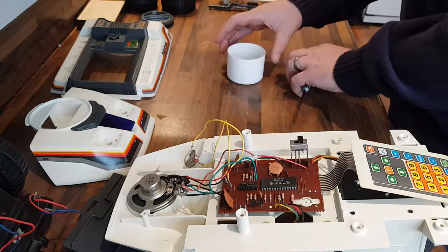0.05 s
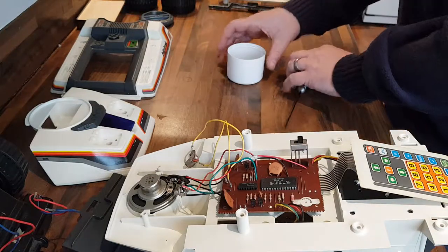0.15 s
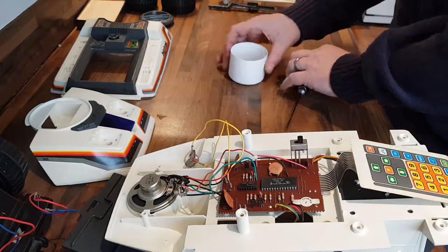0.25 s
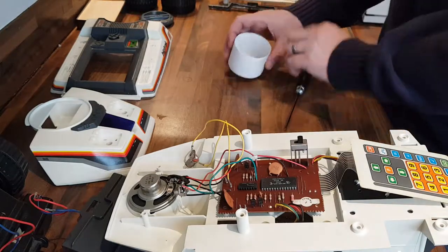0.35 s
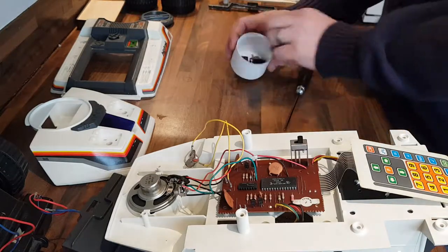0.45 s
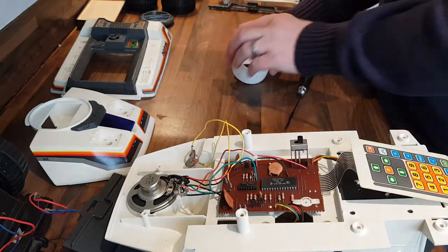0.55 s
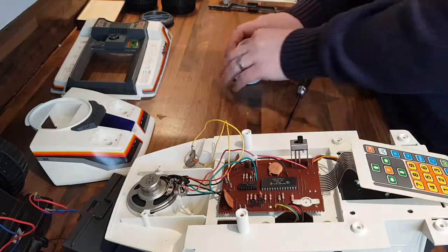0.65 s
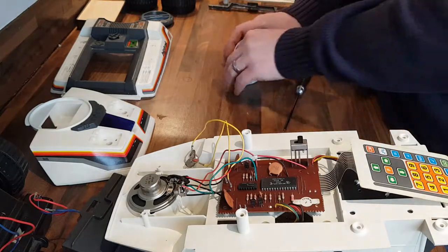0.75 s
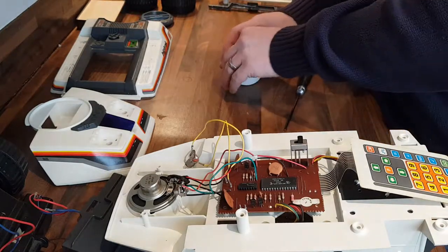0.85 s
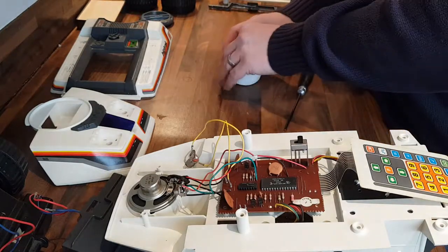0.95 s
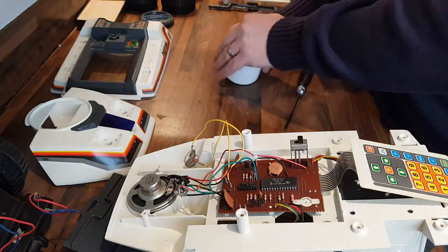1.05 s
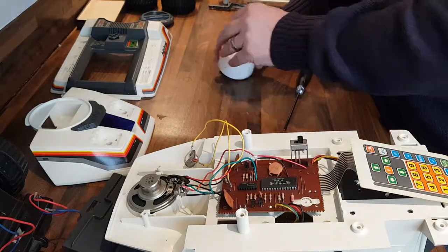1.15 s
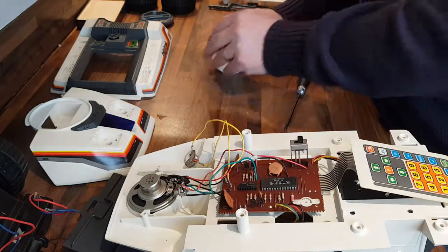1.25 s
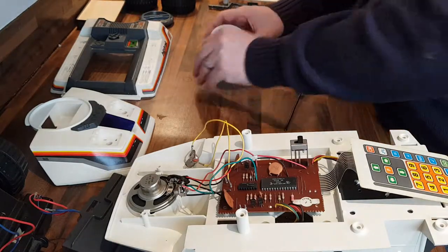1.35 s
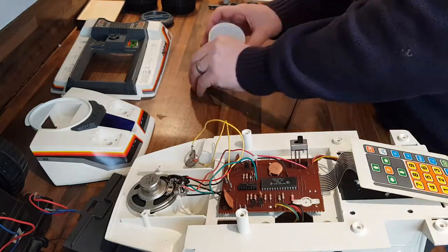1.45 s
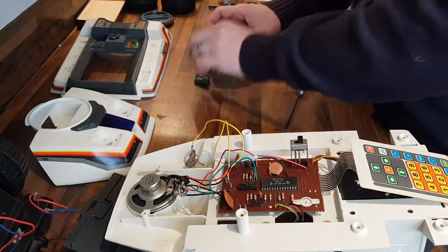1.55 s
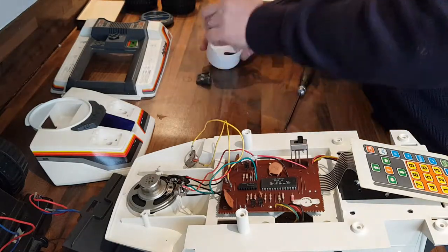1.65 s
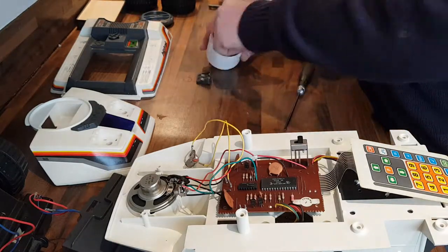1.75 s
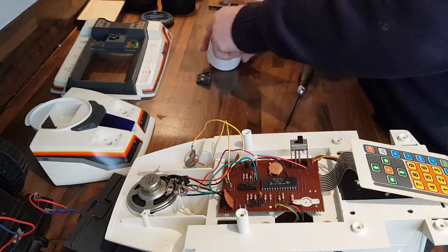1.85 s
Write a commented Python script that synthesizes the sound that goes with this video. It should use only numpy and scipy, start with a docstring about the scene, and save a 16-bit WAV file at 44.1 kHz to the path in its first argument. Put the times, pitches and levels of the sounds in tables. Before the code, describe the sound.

Small metal screws spill from a plastic pot onto a wooden table, then a few drop back

```python
"""A small, fairly live room with a wooden table: a plastic pot of small steel screws is tipped over and knocks.
The screws clink out as clicks with steel ringing modes; fingers roll and tap them as short wood tones and clicks.
The pot knocks and ticks with its own modes and is set upright; a few screws drop back in and rattle, ringing longer.
The microphone is close, the screws slightly to its left; low steady noise lies underneath."""
import sys
import numpy as np
from scipy import signal
from scipy.fft import rfft, irfft, next_fast_len
from scipy.io import wavfile

SR = 44100
rng = np.random.default_rng(int(sys.argv[2]) if len(sys.argv) > 2 else 0)


def master(y):
    """Save y as 16-bit WAV."""
    cut = np.clip(np.atleast_2d(y).T, -1, 1)
    pcm = np.round(cut * 32767)  # scale
    wavfile.write(sys.argv[1], SR, pcm.astype(np.int16))


N = 85995
T = np.arange(SR // 2) / SR  # s, time axis of one contact


def amp(db):
    """Decibels to gain."""
    return 10 ** (np.asarray(db) / 20)


def unit(x):
    """Scale to an energy of one per channel."""
    return x / np.sqrt(np.mean(np.sum(x ** 2, axis=-1)) + 1e-20)


def along(points, hz):
    """Read (freq_hz, value) points on a log frequency axis."""
    freq_hz, value = np.transpose(points)
    return np.interp(np.log(hz + 1), np.log(freq_hz + 1), value)


def burst(colour, tilt_db_per_octave=0, size=4096):
    """Minimum-phase click of a given colour, the shortest causal one, tilted above 500 Hz."""
    hz = np.fft.rfftfreq(size, 1 / SR)
    tilt_db = tilt_db_per_octave * np.log2(np.maximum(hz, 500))
    cepstrum = irfft(np.log(amp(along(colour, hz) + tilt_db)))
    # fold onto positive time: minimum phase
    cepstrum[1:size // 2] *= 2
    cepstrum[size // 2 + 1:] = 0
    click = irfft(np.exp(rfft(cepstrum)))
    return unit(np.pad(click, (0, len(T) - size)))


RING_SCATTER_DB = 2


def ring(modes, t60_s, detune=0, damping=0):
    """Decaying modes, built up within a cycle; balance, sign and pitch vary, damping shortens high ones."""
    total = np.zeros(len(T))
    lowest_hz = modes[0][0]
    for hz, level_db in modes:
        scatter, sign, shift = rng.standard_normal(3)
        decay_db = -60 * T / t60_s * (hz / lowest_hz) ** damping
        envelope = amp(level_db + RING_SCATTER_DB * scatter + decay_db) * (1 - np.exp(-T * hz))
        total += np.sign(sign) * envelope * np.sin(2 * np.pi * hz * (1 + detune * shift) * T)
    return unit(total)


CHATTER_DB = 10  # rebounds relative to first touch


def chatter(sound, t60_s):
    """A first touch followed by a quickly dying run of tiny rebounds."""
    rebounds = rng.standard_normal(len(T)) ** 3 * amp(-60 * T / t60_s)
    contact = amp(CHATTER_DB) * unit(rebounds)
    contact[0] += 1
    return unit(signal.fftconvolve(contact, sound)[:len(T)])


# left-right likeness of diffuse sound: freq_hz, correlation_ratio
LIKENESS = [(100, 0.86), (280, 0.8), (520, 0.67), (1300, 0)]


def diffuse(size):
    """Stereo white noise, alike in the bass and unrelated in the treble."""
    likeness = along(LIKENESS, np.fft.rfftfreq(size, 1 / SR))
    angle = np.arccos(np.clip(likeness, -1, 1)) / 2
    white = rfft(rng.standard_normal((2, size)))
    mid, side = irfft(white * [np.cos(angle), np.sin(angle)], size)
    return np.array([mid + side, mid - side])


# decay of the room's tail: freq_hz, t60_s
ROOM_DECAY = [(100, 0.47), (400, 0.34), (1200, 0.27), (4000, 0.25), (8000, 0.2)]
DIRECT_DB, NEAR_DB, NEAR_T60_S = -7.5, -0.5, 0.051
ROOM_DB, ROOM_RISE_S = -5, 0.0052
LEFT_DB = 0.95  # left up, right down


def in_room(x, open_db=0):
    """Direct sound, quick reflections from the cluttered table, and the room's tail."""
    hz, t, z = signal.stft(diffuse(len(T)), SR, nperseg=256)
    decay = amp(-60 * t / along(ROOM_DECAY, hz)[:, None])
    tail = signal.istft(z * decay, SR, nperseg=256)[1][:, :len(T)]
    tail = unit(tail * (1 - np.exp(-T / ROOM_RISE_S)))
    near = unit(diffuse(len(T)) * amp(-60 * T / NEAR_T60_S))
    answer = amp(ROOM_DB) * tail + amp(NEAR_DB) * near
    answer[:, 0] += amp(DIRECT_DB + open_db)
    return signal.fftconvolve(x[None], answer, axes=1) * amp([[LEFT_DB], [-LEFT_DB]])


HIT_S = .005
OPEN_DB = -3.5  # change of direct sound for knocks and taps on the open table


def add(out, start_s, sound, open_db=0):
    """Sound one contact in the room at start_s; its level counts over HIT_S."""
    part = out[:, max(0, round(start_s * SR)):][:, :len(T)]
    part += np.sqrt(HIT_S * SR) * in_room(sound, open_db)[:, :part.shape[1]]


def patter(levels, per_s, sound):
    """Many tiny contacts at random moments under a (time_s, level_db) curve, silent outside it."""
    kicks = (rng.random(N) < per_s / SR) * np.sign(rng.standard_normal(N))
    time_s, level_db = np.transpose(levels)
    level = amp(np.interp(np.arange(N) / SR, time_s, level_db, left=-np.inf, right=-np.inf))
    train = unit(kicks) * np.sqrt(N) * level
    return in_room(signal.fftconvolve(train, sound)[:N])[:, :N]


# colour of the room noise: freq_hz, level_db
FLOOR_COLOUR = [(20, -4), (95, 9.5), (160, -5.5), (260, -19), (1500, -23.5), (9000, -22.5)]
FLOOR_DB = -63.5


def background():
    """Low, steady room noise: diffuse noise shaped by a fixed colour."""
    colour = amp(along(FLOOR_COLOUR, np.fft.rfftfreq(N, 1 / SR)))
    noise = irfft(rfft(diffuse(N)) * colour, N)
    return amp(FLOOR_DB) * np.sqrt(N) * unit(noise)


# screws tapped down on the tabletop: start_s, wood_db, click_db
TAPS = [(.242, -24.5, -28), (0.575, -29, -31), (0.596, -25.5, -38), (0.617, -31.5, -30),
        (0.7005, -20.5, -31), (0.705, -37, -32), (0.7296, -29.5, -29.5), (0.747, -28, -42),
        (.759, -29, -31.5), (0.775, -36, -33), (.887, -32.5, -40), (0.933, -48, -40.5), (0.949, -33, -61),
        (1.017, -42, -45.5), (1.086, -33.5, -29), (1.092, -40.5, -33.5), (1.306, -43, -38.5),
        (1.346, -46.5, -43.5), (1.904, -40, -44.5), (1.916, -32, -46.5)]
# dull pushes of pot and hand: start_s, level_db
THUMPS = [(0.074, -48.5), (0.245, -36.5), (.268, -35), (0.454, -44.5), (0.573, -47.5), (0.728, -42.5),
          (1.298, -51.5), (1.478, -38), (1.554, -47.5), (1.66, -48.5)]
# screws rolling under the fingers: time_s, level_db
ROLL_LEVELS = [(.3, -86), (.5, -54), (.6, -42.5), (.68, -56), (.77, -50.5), (.95, -41.5), (1.04, -66.5),
               (1.12, -45), (1.2, -110), (1.88, -82.5), (1.91, -47), (2, -73.5)]
# wood tone colour: freq_hz, level_db
WOOD_COLOUR = [(200, -52), (740, -44), (980, -4.5), (1130, 1), (1290, -0.5), (1500, -13), (2100, -34.5),
               (16000, -60)]
# click colour of screw on wood: freq_hz, level_db
CLICK_COLOUR = [(200, -25.5), (480, -14.5), (760, 1), (1700, 7.5), (2250, -6.5), (2750, 6.5), (3700, -1),
                (4800, 1), (7500, -13.5), (9000, -20.5), (16000, -30)]
# low modes of the table: freq_hz, level_db
TABLE_MODES = [(90, 1), (126, 6), (170, 1), (215, -5.5)]
WOOD_SPREAD, SCUFF_T60_S, TABLE_T60_S = .03, 0.033, 0.061
ROLL_PER_S = 260


def table():
    """Wood answers taps and rolling with a short tone, shifting per tap; heavier pushes excite low modes."""
    out = np.zeros((2, N))
    wood, click = burst(WOOD_COLOUR), burst(CLICK_COLOUR)
    for start_s, wood_db, click_db in TAPS:
        pitch_ratio = 1 + WOOD_SPREAD * rng.standard_normal()
        spot = burst(np.multiply(WOOD_COLOUR, [pitch_ratio, 1]))
        tap = amp(wood_db) * spot + amp(click_db) * chatter(click, SCUFF_T60_S)
        add(out, start_s, tap, OPEN_DB)
    for start_s, level_db in THUMPS:
        add(out, start_s, amp(level_db) * ring(TABLE_MODES, TABLE_T60_S))
    return out + patter(ROLL_LEVELS, ROLL_PER_S, wood + click)


# rim knocking on the table: start_s, level_db
KNOCKS = [(.2422, -18), (0.2472, -22), (0.265, -22.5), (0.2759, -23.5), (.291, -25), (.310, -24.5),
          (0.571, -36), (0.7, -35), (1.087, -39), (1.299, -41.5), (1.343, -42.5), (1.475, -39),
          (1.668, -31.5), (1.912, -42.5)]
# light ticks on the thin wall: start_s, level_db
TICKS = [(.0085, -33.5), (0.025, -39), (0.0372, -47.5), (0.1446, -46.5), (1.473, -36)]
# pot scuffing as it is taken up: time_s, level_db
SLIDE_LEVELS = [(0, -50.5), (.2, -63.5)]
# rim rolling on the table: time_s, level_db
RIM_LEVELS = [(.28, -46.5), (.4, -56.5), (.455, -48.5), (.475, -77.5)]
# knock contact colour: freq_hz, level_db
KNOCK_COLOUR = [(60, -27.5), (150, 0.5), (250, -9), (400, -1.5), (620, -5), (1150, 5.5), (1900, 0),
                (2600, -5.5), (3600, -9.5), (7000, -42), (16000, -38)]
# tick contact colour: freq_hz, level_db
TICK_COLOUR = [(200, -15), (1000, -9.5), (3300, -1), (6200, -3), (7400, -11.5), (16000, -22)]
# modes of the pot against the table: freq_hz, level_db
POT_MODES = [(327, -13), (410, -6), (798, -6), (1150, -2), (1304, -3), (1657, -3), (1696, -1), (1782, -2),
             (1944, -1), (2351, -3)]
# modes of the thin wall: freq_hz, level_db
WALL_MODES = [(3900, -7), (4890, 0), (5510, -2), (6120, 0)]
FULL_KNOCK_DB, FULL_KNOCK_RING_DB, RING_DB_PER_DB = -17, -1, 0.86  # soft knocks, in the hand, hardly ring
FULL_TICK_DB, FULL_TICK_RING_DB = -36, -1
POT_T60_S, RIM_T60_S, WALL_T60_S = 0.25, .12, .03
KNOCK_LEFT_OFFSET_DB = -0.65  # on top of LEFT_DB


def pot():
    """Rim knocks ring more the harder they are; the wall ticks, the lifted pot scuffs, the rolling rim hums."""
    out = np.zeros((2, N))
    knock, tick = burst(KNOCK_COLOUR), burst(TICK_COLOUR)
    for start_s, level_db in KNOCKS:
        ring_db = FULL_KNOCK_RING_DB + RING_DB_PER_DB * min(level_db - FULL_KNOCK_DB, 0)
        sound = knock + amp(ring_db) * ring(POT_MODES, POT_T60_S)
        add(out, start_s, amp(level_db) * sound, OPEN_DB)
    out *= amp([[KNOCK_LEFT_OFFSET_DB], [-KNOCK_LEFT_OFFSET_DB]])
    for start_s, level_db in TICKS:
        ring_db = FULL_TICK_RING_DB + min(level_db - FULL_TICK_DB, 0)
        sound = chatter(tick, t60_s=0.0062) + amp(ring_db) * ring(WALL_MODES, WALL_T60_S)
        add(out, start_s, amp(level_db) * sound)
    out += patter(SLIDE_LEVELS, ROLL_PER_S, knock)
    return out + patter(RIM_LEVELS, ROLL_PER_S, ring(POT_MODES[:2], RIM_T60_S))


# steel on steel, spilling and sorted: start_s, level_db, tilt_db_per_octave
CLINKS = [(0.2188, -17, 1), (.224, -37, 14), (0.2706, -19, 1), (.3095, -26, -7), (0.3254, -26, 3.5),
          (0.3661, -24.5, 5.5), (.394, -26.5, 2), (0.447, -32.5, 3), (0.591, -37.5, -2.5),
          (0.6146, -34.5, 0), (0.7558, -29.5, 7), (0.869, -43.5, -1.5), (1.017, -47.5, -1), (1.118, -41, 6)]
# screws dropping back into the pot: start_s, level_db
DROPS = [(1.548, -35.5), (1.5562, -25), (1.5985, -42), (1.6205, -27), (1.65, -39), (1.71, -58)]
# loose screws jostling on the table: time_s, level_db
JOSTLE_LEVELS = [(.23, -37), (.3, -41), (.45, -41), (.5, -57), (.76, -40), (.82, -84), (1.14, -50.5),
                 (1.22, -69)]
# dropped screws spinning to rest in the pot: time_s, level_db
SPIN_LEVELS = [(1.56, -42), (1.67, -42.5), (1.74, -48), (1.79, -76)]
# clink contact colour: freq_hz, level_db
CLINK_COLOUR = [(150, -30), (500, -13), (1000, -1), (2000, -2.5), (3200, 0.5), (4300, -1.5), (6000, 2),
                (8000, -3.5), (9300, -10), (13000, -11.5), (15500, -27.5)]
# modes of screws in a heap, damping each other: freq_hz, level_db
HEAP_MODES = [(4860, -4), (5700, 2), (6040, -2), (6735, -7), (7640, -4), (8610, -8), (9997, -11)]
# modes of a screw lying free in the pot: freq_hz, level_db
FREE_MODES = [(5857, -2), (6309, 1), (7698, 1), (8629, -11), (10700, -9), (11900, -6)]
CHATTER_T60_S, STEEL_DETUNE = 0.012, .005
HEAP_T60_S, HEAP_RING_DB = .07, -7.5
FREE_T60_S, FREE_RING_DB, FREE_DAMPING = .23, -5, 1.4  # t60 of the lowest mode
JOSTLE_PER_S, JOSTLE_RING_DB = 240, -12.5


def screws():
    """Hard contact, brief chatter and thin steel ring, longer for a lone screw in the pot; lesser ones jostle."""
    out = np.zeros((2, N))
    for start_s, level_db, tilt in CLINKS:
        contact = chatter(burst(CLINK_COLOUR, tilt), CHATTER_T60_S)
        steel = ring(HEAP_MODES, HEAP_T60_S, STEEL_DETUNE)
        add(out, start_s, amp(level_db) * (contact + amp(HEAP_RING_DB) * steel))
    for start_s, level_db in DROPS:
        contact = chatter(burst(CLINK_COLOUR, 1.0), CHATTER_T60_S)
        steel = ring(FREE_MODES, FREE_T60_S, STEEL_DETUNE, FREE_DAMPING)
        add(out, start_s, amp(level_db) * (contact + amp(FREE_RING_DB) * steel))
    for levels, modes in ((JOSTLE_LEVELS, HEAP_MODES), (SPIN_LEVELS, FREE_MODES)):
        contact = burst(CLINK_COLOUR, -3.0) + amp(JOSTLE_RING_DB) * ring(modes, HEAP_T60_S)
        out += patter(levels, JOSTLE_PER_S, contact)
    return out


def scene():
    """Screws, pot and table over the quiet room."""
    return screws() + pot() + table() + background()


TOP_HZ = 15900


def record(dry):
    """Steep low-pass: the recorder keeps nothing above its band limit."""
    size = next_fast_len(N + SR // 2)
    hz = np.fft.rfftfreq(size, 1 / SR)
    return irfft(rfft(dry, size) / (1 + (hz / TOP_HZ) ** 120), size)[:, :N]


dry = scene()
out = record(dry)
master(out)
```